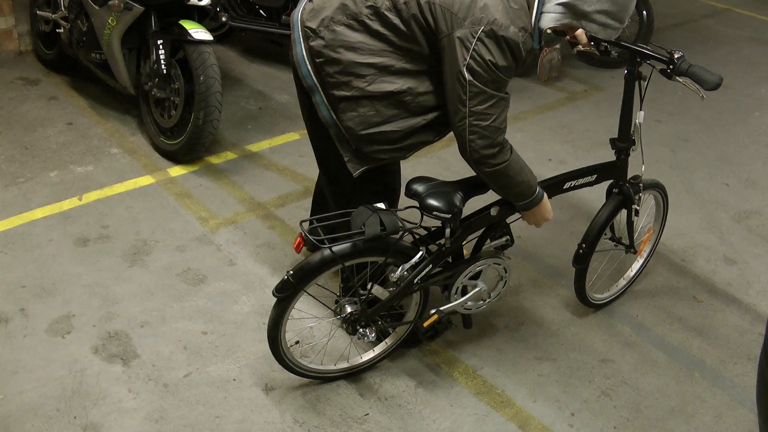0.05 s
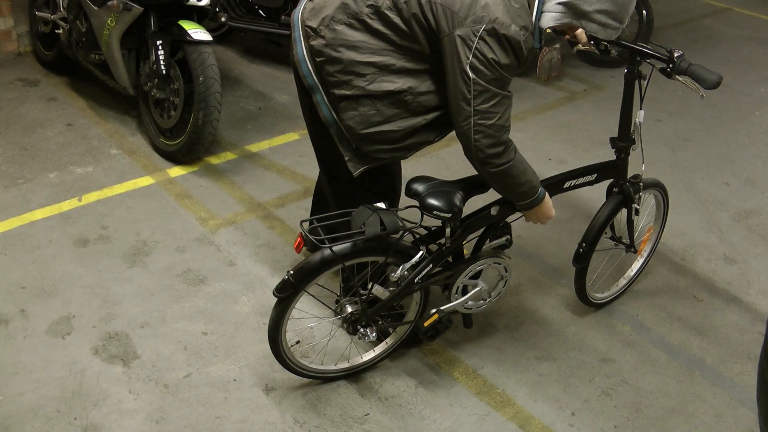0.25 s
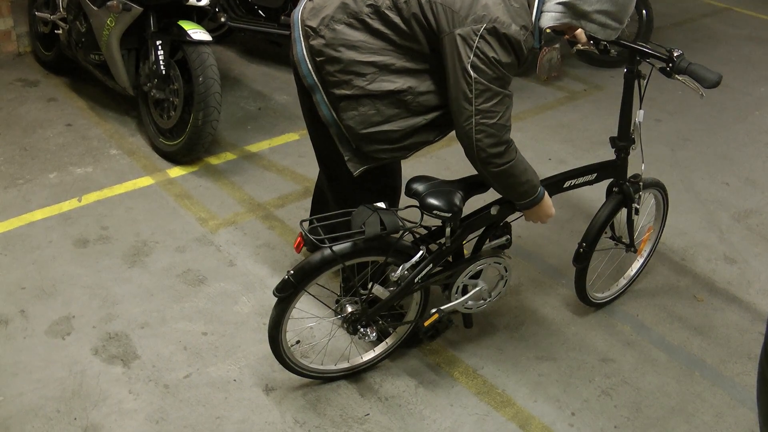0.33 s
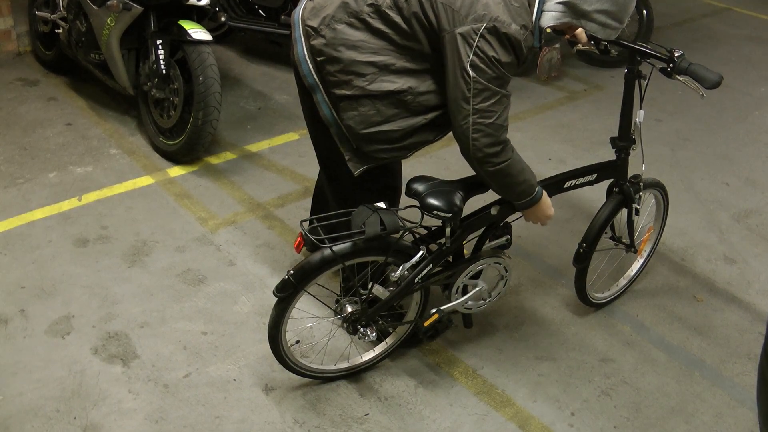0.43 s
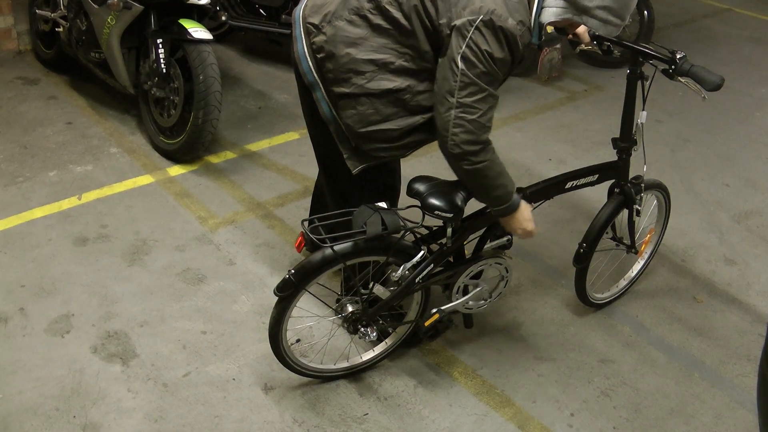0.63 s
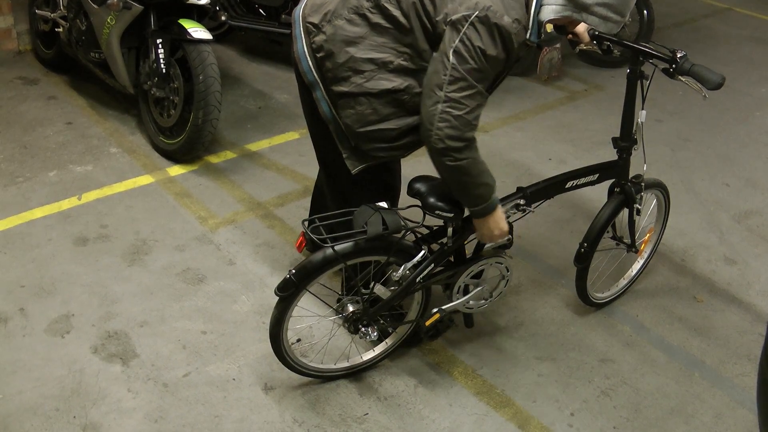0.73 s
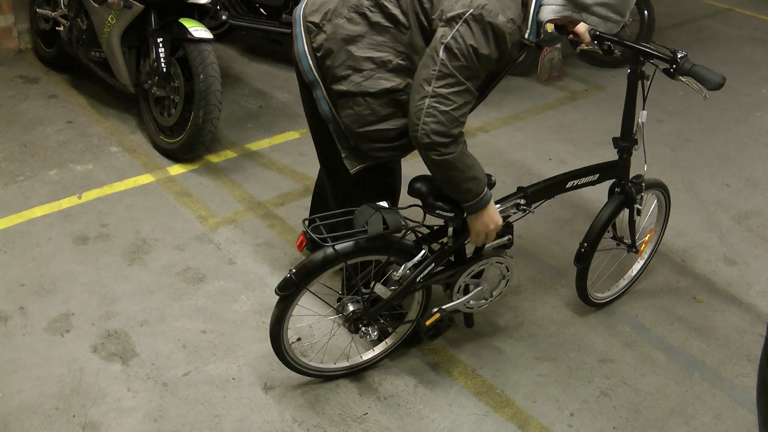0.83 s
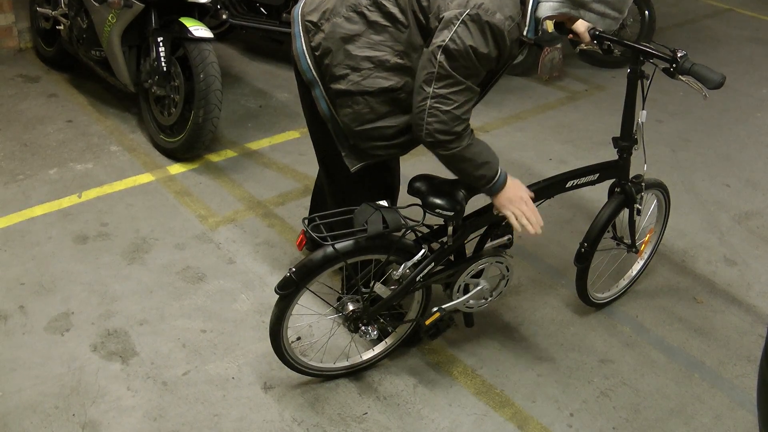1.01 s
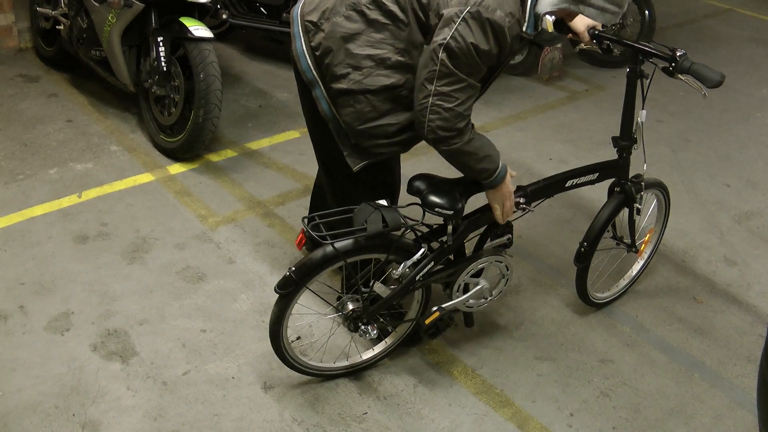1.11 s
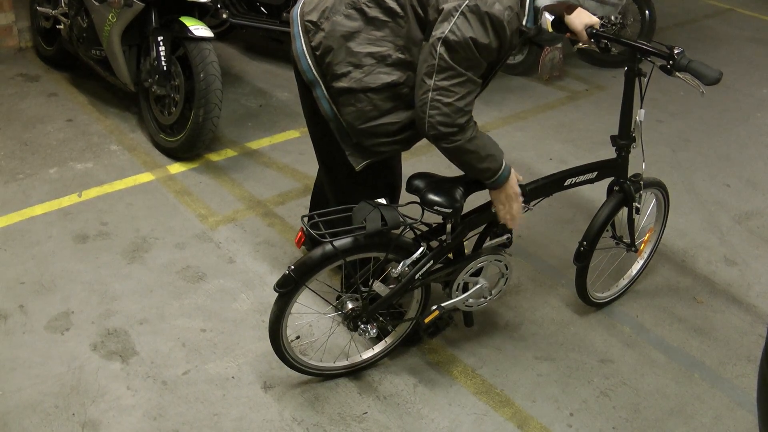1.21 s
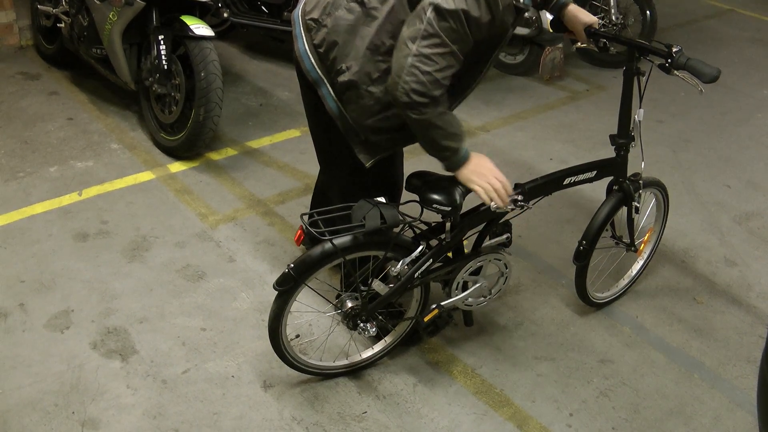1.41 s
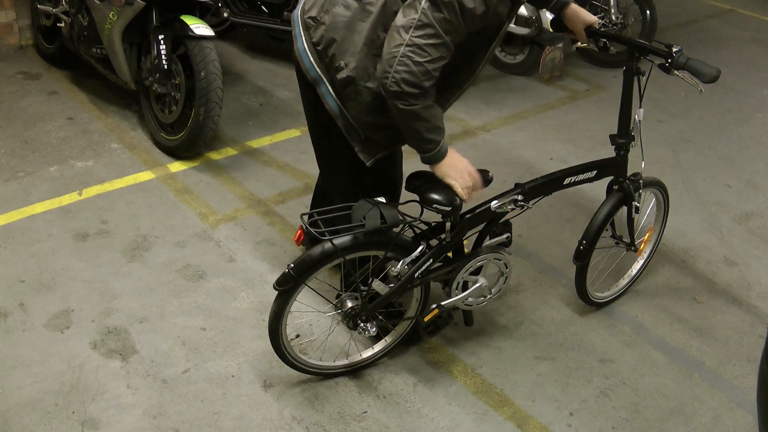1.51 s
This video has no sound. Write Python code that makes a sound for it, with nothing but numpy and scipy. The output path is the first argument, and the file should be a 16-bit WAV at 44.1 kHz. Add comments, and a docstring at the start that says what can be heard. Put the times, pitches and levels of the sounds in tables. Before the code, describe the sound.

A folding bicycle's latches snap and click four times over a faint garage ventilation hum.

```python
"""Folding bicycle in a parking garage

Close to the bicycle, one mono microphone: a lever snaps, a catch ticks, the hinge knocks, the clamp
shuts. Each click is a few quick contacts that set off a dense, short metallic clatter and some longer
modes. Hand and sleeve rub softly. Farther off, the concrete garage answers with a bright tail, and
ventilation hums and hisses throughout."""
import sys
import numpy as np
from scipy import signal
from scipy.fft import rfft, irfft
from scipy.io import wavfile
from scipy.ndimage import uniform_filter1d

SR = 44100
rng = np.random.default_rng(int(sys.argv[2]) if len(sys.argv) > 2 else 0)


def store_wav(level_fs):
    """Save 16-bit WAV to argv[1]."""
    pcm = np.round(np.clip(np.atleast_2d(level_fs), -1, 1) * 32767)
    wavfile.write(sys.argv[1], SR, pcm.T.astype(np.int16))


N = 68355
TIME_S = np.arange(N) / SR
BIN_HZ = np.arange(N // 2 + 1) * SR / N

# Metal meeting metal, close to the microphone, by part: start_s, relative_db
CONTACTS = { "lever": [(0.2195, -16), (0.2231, 1), (0.2270, -4), (0.2323, -7), (0.2435, -16)],
            "catch": [(0.5624, 0.5), (0.5700, -1), (0.5750, -8)], "hinge": [(0.6816, -0.5), (0.6842, -3),
            (0.6885, 1.5)], "clamp": [(1.1436, 0.5), (1.1528, -6.5)]}
# Clatter of each part: level_db, t60_s, room_send_db
CLATTER = {"lever": (-19.5, 0.056, -6.5), "catch": (-30, 0.069, -8.5), "hinge": (-20, .04, -7.5),
           "clamp": (-15.5, 0.058, -7)}
# Spectra of the clatter: frequency_hz, relative_db
LEVER_COLOUR = [(650, -62), (1100, -40), (1320, -41), (1400, -21), (1510, -22), (1560, -17), (1690, -20.5),
                (1770, -6), (1890, -10.5), (2030, -8.5), (2220, -14.5), (2540, -2), (2690, -7.5),
                (3160, -9), (3610, -10), (3870, -14.5), (4910, -8), (5310, -10.5), (6670, -6), (7810, -4.5),
                (8460, -9.5), (9910, -4), (10700, -10.5), (15200, -19.5), (16500, -24)]
CATCH_COLOUR = [(820, -57), (1400, -20), (1560, -33), (1780, -2), (1940, -9), (2200, -10), (2400, -2),
                (2670, -9), (3110, -0.5), (3400, -9.5), (3630, 1.5), (3810, -16), (4040, -0.5),
                (4410, -8.5), (4950, -2.5), (5340, -12), (5610, -11.5), (6730, 0), (7060, -13),
                (7630, -1.5), (8650, -18), (8900, -12.5), (11200, -27.5), (11700, -31), (14000, -47)]
HINGE_COLOUR = [(410, -56), (700, -28), (820, -29), (876, -27.5), (1160, -22), (1250, -18), (1300, -15.5),
                (1590, -17.5), (1740, -7.5), (2040, -7.5), (2210, -13.5), (2880, -1.5), (3200, -17.5),
                (3470, -9), (3750, -13), (4520, -14.5), (5360, -8), (6370, -13), (7560, -12.5), (8190, -11),
                (8860, -16), (9470, -11), (12200, -22), (15000, -15.5), (16500, -32)]
CLAMP_COLOUR = [(180, -48), (300, -29), (522, -25.5), (607, -38), (730, -11.5), (907, -33), (1110, -17),
                (1330, -23.5), (1630, -9), (1870, -14), (1960, -4), (2170, -9), (2280, -10.5), (2570, -0.5),
                (2840, -4.5), (3360, -8.5), (3650, -0.5), (4030, -10.5), (5550, -7.5), (6900, -11.5),
                (7500, -8), (9490, -11), (10900, -15), (11800, -13), (16500, -26)]


def clatter(part, colour):
    """Quick contacts set off a dense metallic noise; returns the direct sound and the room send."""
    level_db, t60_s, send_db = CLATTER[part]
    power = sum((from_db(db) * decay(start_s, t60_s)) ** 2 for start_s, db in CONTACTS[part])
    direct = from_db(level_db) * tinted(burst(np.sqrt(power)), colour)
    return np.array([direct, from_db(send_db) * direct])


# Ringing of each part, applied to all its modes: gain_db, decay_stretch, room_send_db
RINGING = {"lever": (-0.88, 0.75, -10.5), "catch": (-0.7, 1, -11.5), "hinge": (-0.16, 0.74, -10.5),
           "clamp": (-0.85, 0.85, -11)}
# Modes of the metal: pitch_hz, base_level_db, base_t60_s
LEVER_MODES = [(1802, -39, .24), (2490, -29, .13), (2575, -37, .2), (2620, -30, .18), (2853, -35, .4),
               (5428, -33, .1), (5600, -36, .14), (6298, -33, .1), (6424, -32, .1), (6546, -35, .16),
               (7487, -33, .1), (9881, -30, .1), (10204, -31, .13), (10893, -34, .12)]
CATCH_MODES = [(1801, -39, .2), (2853, -50, .4), (3160, -35, .14), (4094, -42, .3), (4926, -44, .2),
               (5747, -47, .28), (6090, -38, .1), (6704, -39, .2), (6763, -40, .14), (7376, -45, .28),
               (7484, -37, .1), (7743, -40, .25), (7922, -42, .4), (8424, -42, .1)]
HINGE_MODES = [(1797, -36, .2), (2020, -33, .15), (2630, -30, .12), (2785, -28, .1), (2850, -27, .33),
               (2915, -37, .12), (3235, -42, .3), (3565, -36, .1), (4993, -34, .1), (5222, -34, .22),
               (5448, -38, .14), (5538, -39, .2), (5908, -38, .1), (9465, -35, .1)]
CLAMP_MODES = [(735, -40, .07), (2003, -27, .2), (2495, -33, .12), (2600, -28, .12), (2853, -35, .25),
               (3015, -37, .5), (3565, -34, .2), (3644, -28, .24), (3748, -35, .33), (4991, -33, .16),
               (5436, -29, .12), (5904, -35, .12), (7925, -33, .1), (9071, -35, .14)]


def ringing(part, modes):
    """The first firm contact sets the modes ringing; returns the direct sound and the room send."""
    gain_db, stretch, send_db = RINGING[part]
    hardest_db = max(db for _, db in CONTACTS[part])
    start_s = next(s for s, db in CONTACTS[part] if db > hardest_db - 10)
    direct = 0
    for pitch_hz, db, base_t60_s in modes:
        tone = np.sin(2 * np.pi * (pitch_hz * TIME_S + rng.random()))
        direct += from_db(gain_db + db) * decay(start_s, stretch * base_t60_s) * tone
    return np.array([direct, from_db(send_db) * direct])


def click(part, colour, modes):
    """One part snaps home: a short clatter, and modes that ring on."""
    return clatter(part, colour) + ringing(part, modes)


# Hand and sleeve, near and dry: peak_s, level_db, half_width_s
RUBS = [(0.125, -60, 0.023), (0.196, -50, 0.013), (1.426, -57, 0.081), (1.53, -55, .03)]
# Spectrum of the friction: frequency_hz, relative_db
RUB_COLOUR = [(1800, 4), (3000, 2), (7500, 1.5), (10000, -8), (16000, -15)]


def rubs():
    """Brief swells of friction noise as the hand shifts its grip."""
    swells = sum(from_db(db) * np.exp(-((TIME_S - peak_s) / half_width_s) ** 2)
                 for peak_s, db, half_width_s in RUBS)
    return swells * tinted(rng.standard_normal(N), RUB_COLOUR)


# Reverberation of the concrete all around: frequency_hz, t60_s
GARAGE_T60 = [(500, 0.45), (2500, 0.68), (5000, 0.7), (8000, 0.43), (11000, 0.32), (16000, 0.31)]
# Strength of the tail off the walls: frequency_hz, relative_db
WALL_COLOUR = [(1000, -0.5), (3000, .5), (7000, 0), (11000, -1), (16000, -1.5)]


def garage():
    """Impulse response of the garage: early reflections and a diffuse tail whose top dies first."""
    delay_s, build_s = 0.008, 0.004
    echo_count, echo_span_s, echo_gain = 10, 0.054, from_db(-4.5) / 2
    white = rfft(rng.standard_normal(N))
    centres_hz = np.geomspace(400, 17000, 14)
    tail = 0
    for hz, band_weights in zip(centres_hz, np.eye(len(centres_hz))):
        band = irfft(white * np.interp(BIN_HZ, centres_hz, band_weights), N)
        tail += from_db(at_hz(WALL_COLOUR, hz)) * band * decay(0, at_hz(GARAGE_T60, hz))
    tail *= 1 - np.exp(-np.maximum(TIME_S - delay_s, 0) / build_s)
    tail /= np.sqrt(np.sum(tail ** 2))
    # The floor and parked vehicles reflect; later echoes reach the microphone weaker.
    for lateness, polarity in rng.random((echo_count, 2)):
        arrival = int((delay_s + lateness * echo_span_s) * SR)
        tail[arrival] += np.sign(polarity - 0.5) * echo_gain * (1 - lateness)
    return tail


# Moving air in the background: frequency_hz, relative_db
AIR_COLOUR = [(15, -48), (25, -8), (93, -7.5), (122, -10), (160, -3), (199, -11), (316, -8.5), (393, -15),
              (698, -10.5), (968, -19), (1050, -11.5), (1140, -18), (1240, -15.5), (2320, -16.5),
              (2810, -19.5), (3050, -17.5), (3890, -19.5), (4590, -20), (5550, -20), (6190, -24),
              (9580, -36.5), (14400, -39), (17000, -45)]
# Hum of fans and ducts: pitch_hz, level_db, phase_drift_rad2_per_s
FAN_TONES = [(56.8, -64.5, 12), (95.8, -65, 19), (148.2, -54.5, 8.5), (203.2, -69.5, 13), (246, -70, 2.7),
             (297.7, -63, 6), (349.8, -68.5, 8.2), (693.6, -67, 21)]


def ventilation(air_db=-50.5):
    """A steady rush of air with wavering fan tones."""
    air = from_db(air_db) * tinted(rng.standard_normal(N), AIR_COLOUR)
    hum = 0
    for pitch_hz, level_db, drift in FAN_TONES:
        wander = np.cumsum(rng.standard_normal(N)) * np.sqrt(drift / SR)
        hum += from_db(level_db) * rms_one(np.sin(2 * np.pi * pitch_hz * TIME_S + wander))
    return air + hum


def from_db(db):
    """Decibels to gain."""
    return 10 ** (np.asarray(db) / 20)


def rms_one(x):
    """Scale to unit rms."""
    return x / np.sqrt(np.mean(x ** 2) + 1e-20)


def at_hz(points, hz):
    """Read a table on a log-frequency axis."""
    points_hz, values = np.transpose(points)
    return np.interp(np.log(hz + 1), np.log(points_hz), values)


def decay(start_s, t60_s, attack_s=0.00039):
    """A quick rise, then an exponential fall."""
    age_s = np.maximum(TIME_S - start_s, 0)
    return (1 - np.exp(-age_s / attack_s)) * np.exp(-np.log(1000) * age_s / t60_s)


def tinted(x, colour):
    """Give a sound this spectrum, falling away below its first point; white noise keeps its power."""
    bass_rolloff = np.minimum(BIN_HZ / colour[0][0], 1) ** 2
    gain = from_db(at_hz(colour, BIN_HZ)) * bass_rolloff
    return irfft(rfft(x) * rms_one(gain), N)


def burst(envelope):
    """Noise under an envelope, evened out so that it excites all frequencies alike."""
    x = rng.standard_normal(N) * envelope
    for _ in range(3):
        flat = irfft(np.exp(1j * np.angle(rfft(x))), N)
        local_rms = np.sqrt(np.abs(uniform_filter1d(flat ** 2, size=128)) + 1e-14)
        x = envelope * flat / local_rms
    return x


def scene():
    """Four clicks and the rubs up close, the reverberation and the ventilation behind them."""
    direct, room_send = (click("lever", LEVER_COLOUR, LEVER_MODES)
                         + click("catch", CATCH_COLOUR, CATCH_MODES)
                         + click("hinge", HINGE_COLOUR, HINGE_MODES)
                         + click("clamp", CLAMP_COLOUR, CLAMP_MODES))
    reverberation = signal.fftconvolve(room_send, garage())[:N]
    return (direct + reverberation + rubs() + ventilation())[None]


def record(dry):
    """The microphone chain rounds the peaks, then cuts the deep bass and the top."""
    peak_limit, low_cut_hz, high_cut_hz = 0.44, 33, 16500
    rounded = peak_limit * np.tanh(dry / peak_limit)
    low_cut = signal.butter(2, low_cut_hz, "high", fs=SR, output="sos")
    high_cut = signal.ellip(10, 0.1, 70, high_cut_hz, fs=SR, output="sos")
    return signal.sosfilt(high_cut, signal.sosfilt(low_cut, rounded))


dry = scene()
out = record(dry)
store_wav(out)
```